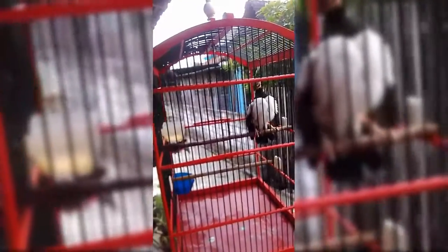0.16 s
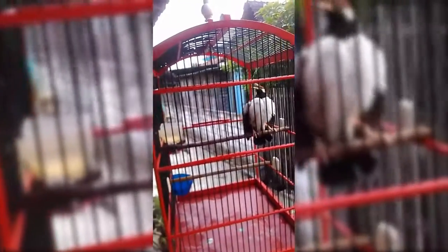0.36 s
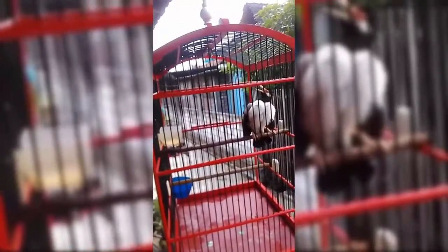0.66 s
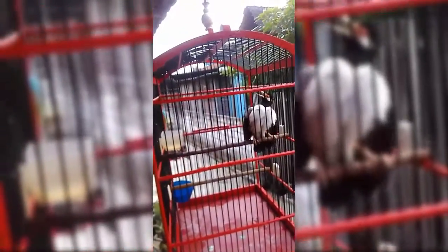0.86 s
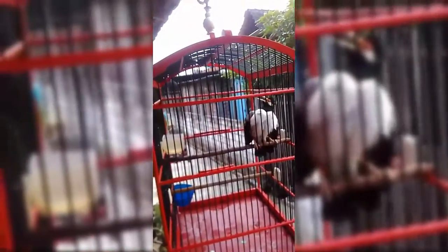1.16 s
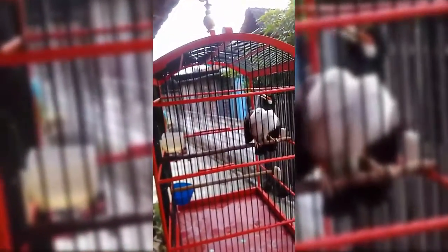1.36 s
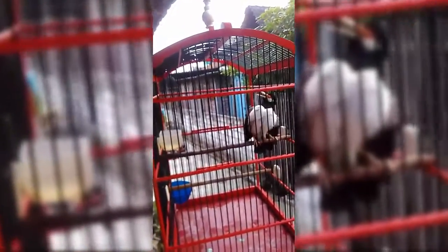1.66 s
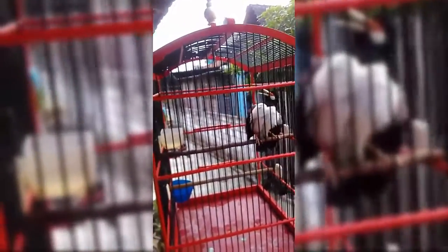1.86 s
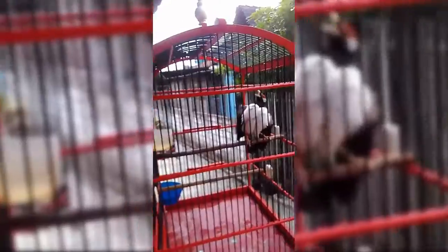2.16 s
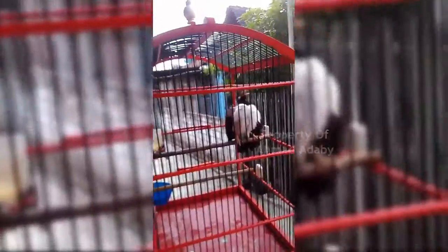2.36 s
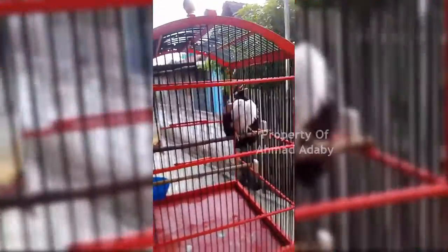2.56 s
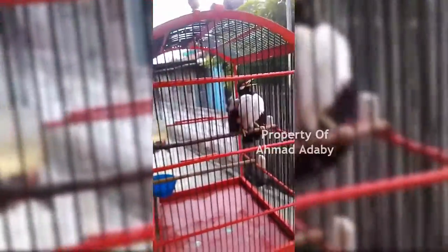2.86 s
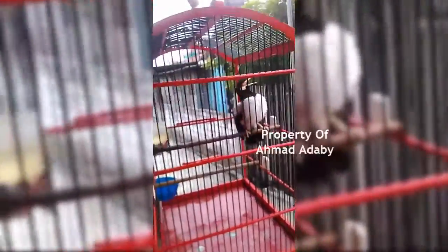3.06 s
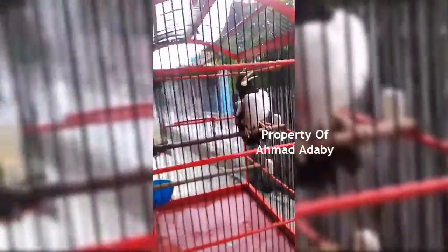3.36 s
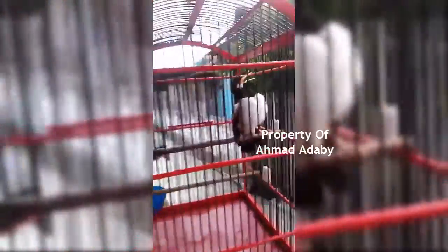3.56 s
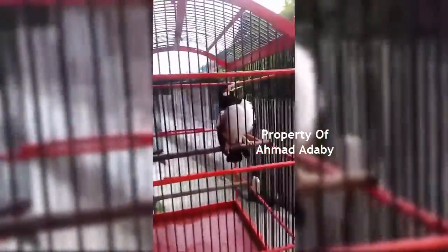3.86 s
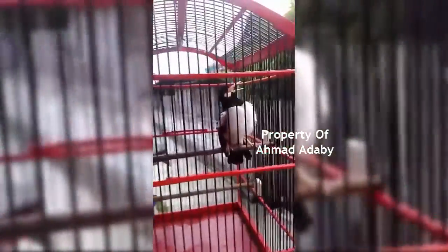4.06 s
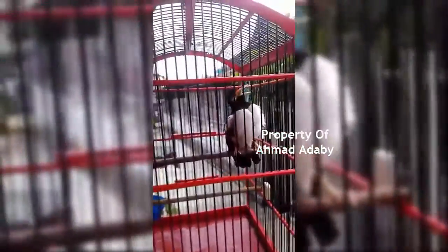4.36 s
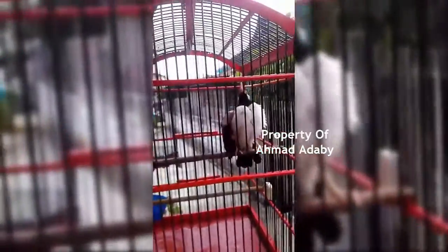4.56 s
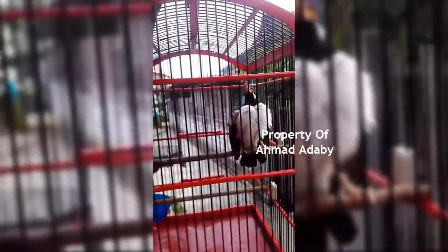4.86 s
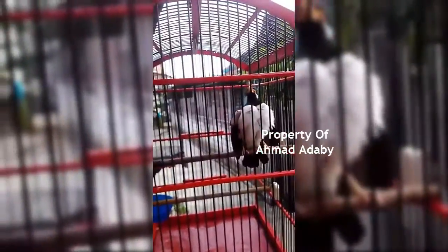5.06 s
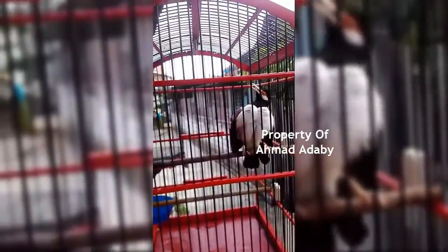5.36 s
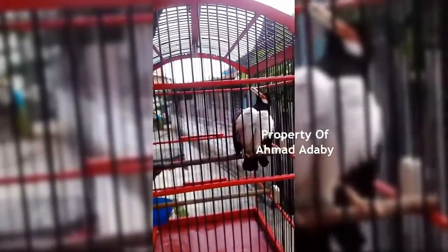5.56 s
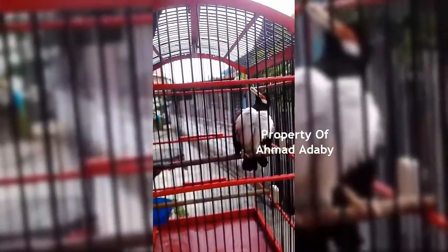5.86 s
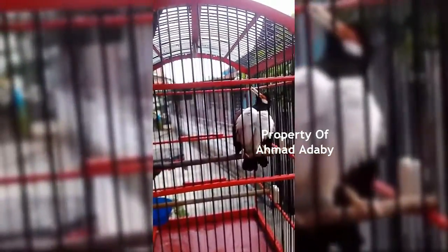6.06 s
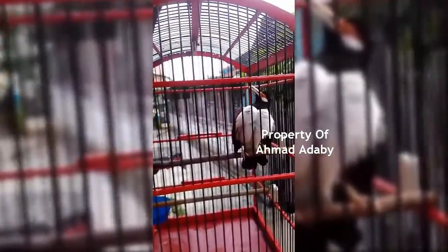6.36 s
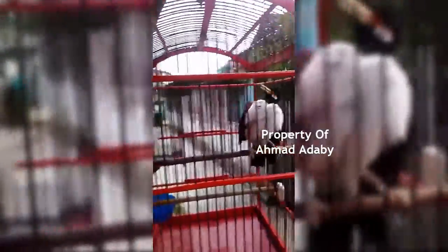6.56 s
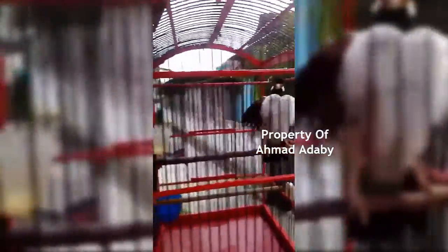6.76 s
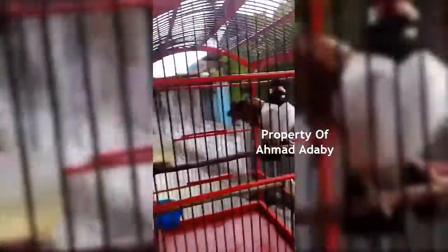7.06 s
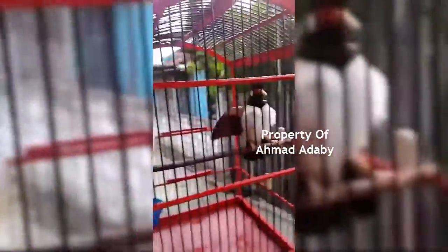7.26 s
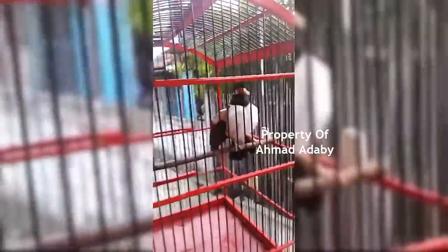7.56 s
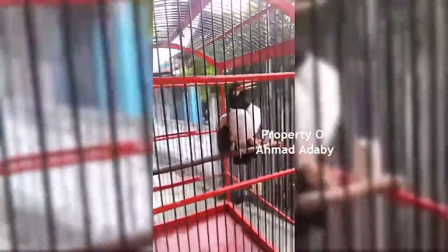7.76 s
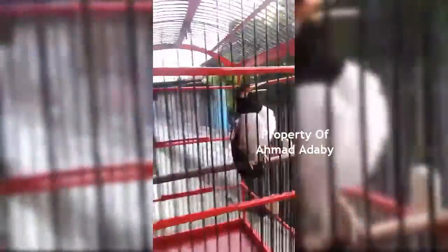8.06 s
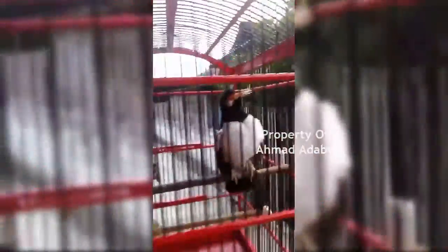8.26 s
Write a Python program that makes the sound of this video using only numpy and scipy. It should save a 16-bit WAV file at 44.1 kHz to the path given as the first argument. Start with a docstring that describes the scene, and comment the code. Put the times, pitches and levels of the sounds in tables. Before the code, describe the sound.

A caged starling sings rasps, screeches, whistles, chatter and trills up close, while wind buffets the microphone and another bird calls further off.

```python
"""A starling's rasp opens a run of screeches, whistles, chatter and trills, close to two microphone ports.
It sings from a cage in a walled yard, on the swinging membranes of its syrinx; another bird calls further
off. Wind buffets both ports and hums across the left one, over a faint hiss.
The recorder changes its sample rate crudely, which scatters mirror lines around every note."""
import sys
import numpy as np
from scipy import signal
from scipy.fft import rfft, irfft
from scipy.io import wavfile
from scipy.ndimage import uniform_filter1d

SR = 44100
rng = np.random.default_rng(int(sys.argv[2]) if len(sys.argv) > 2 else 0)


def to_wav(sig):
    """Store sig (one row per channel, or 1-D mono) as 16-bit WAV at the path in sys.argv[1].

    Samples outside -1..1 are clipped; the rate is SR.
    """
    pcm = np.clip(np.atleast_2d(sig), -1, 1) * 32767
    pcm = np.round(pcm).astype(np.int16)
    wavfile.write(sys.argv[1], SR, pcm.T)  # frames by channels


N = 370440   # 8.4 s


def from_db(db):
    return 10 ** (np.asarray(db) / 20)


def rms_one(x):
    return x / np.sqrt(np.mean(x ** 2) + 1e-20)


def drift(rate_hz):
    """Random wander: noise through a double one-pole low-pass; rms 1."""
    r = np.exp(-2 * np.pi * rate_hz / SR)
    return rms_one(signal.lfilter([1], [1, -2 * r, r * r], rng.standard_normal(N + SR))[SR:])


def coloured(spectrum):
    """Unrelated noise for each port, shaped by (f/Hz, level/dB) points; rms 1."""
    hz, db = np.transpose(spectrum)
    bin_hz = np.arange(N // 2 + 1) * SR / N
    gain = from_db(np.interp(np.log(bin_hz + 1), np.log(hz), db))
    return rms_one(irfft(rfft(rng.standard_normal((2, N))) * gain, N))


def resonance(x, hz, width_hz):
    r = np.exp(-np.pi * width_hz / SR)
    return signal.lfilter([1, 0, -1], [1, -2 * r * np.cos(2 * np.pi * hz / SR), r * r], x)


def contours(notes):
    """Columns of a list of notes over time, and a gate with 2 ms edges."""
    t, gate = np.arange(N) / SR, np.zeros(N)
    for note in notes:
        gate[int(note[0][0] * SR):int(note[-1][0] * SR) + 1] = 1
    times, *columns = np.transpose(np.concatenate(notes))
    return [np.interp(t, times, c) for c in columns], uniform_filter1d(gate, 90)


def hiss(level_db=-53):
    """A faint, steady noise floor, strongest near 300 Hz."""
    # f/Hz, level/dB
    spectrum = [(180, -30.5), (300, -2), (434, -21), (694, -23.5), (742, -24), (1430, -24.5),
                (5550, -25.5), (14200, -24), (16500, -64)]
    return from_db(level_db) * coloured(spectrum)


def wind():
    """Lumpy pressure on each port separately; air across the left opening hums and rushes."""
    # gusts at the microphone: t/s, buffeting level/dB, hum and rush level/dB
    gusts = [(0.0, -48, -26), (0.07, -17.5, -42), (0.28, -32, -36.5), (0.42, -18.5, -35.5),
             (0.49, -21.5, -44), (0.61, -35, -48), (0.68, -26, -56), (0.89, -34, -57), (1.1, -26, -77),
             (1.17, -24, -46), (1.24, -44, -39), (1.31, -22, -38.5), (1.45, -37, -38.5), (1.52, -20.5, -34),
             (1.61, -47, -38), (1.68, -39, -46.5), (1.78, -19, -64), (1.92, -33, -55), (2.03, -35.5, -60),
             (2.1, -21.5, -58), (2.36, -38.5, -56), (2.5, -21.5, -29), (2.62, -25, -46.5), (2.71, -33, -38),
             (2.88, -31, -39.5), (3.02, -35, -36), (3.16, -31.5, -33), (3.3, -37, -33), (3.41, -26, -39.5),
             (3.48, -37, -46), (3.81, -31.5, -62), (3.9, -24.5, -65), (3.95, -32, -53.5), (4.05, -41, -55),
             (4.19, -31, -43), (4.3, -16, -51), (4.42, -28.5, -50.5), (4.47, -16, -35), (4.7, -27.5, -36),
             (4.84, -21.5, -36), (4.96, -25, -38), (5.15, -20.5, -50.5), (5.29, -34, -50.5),
             (5.54, -29, -52), (5.61, -20.5, -43), (5.71, -31.5, -39), (5.85, -33.5, -54),
             (6.13, -34.5, -71.5), (6.25, -37.5, -70), (6.41, -35, -65.5), (6.62, -39, -52),
             (6.85, -38.5, -66), (7.02, -35, -73), (7.3, -38, -70), (7.51, -47, -71), (7.67, -33.5, -70),
             (7.76, -41, -72), (7.98, -29, -36), (8.09, -29, -46.5), (8.28, -25, -38), (8.33, -8, -31),
             (8.4, -16, -52)]
    # pressure on the ports: f/Hz, level/dB
    buffet_spectrum = [(12, -35), (20, 2), (123, -20), (217, -25.5), (269, -29.5), (431, -38.5),
                       (500, -31.5), (650, -66.5), (1100, -120)]
    # air rushing past: f/Hz, level/dB
    rush_spectrum = [(120, -50), (200, -20), (540, -16), (620, -8), (888, -22.5), (1110, -15),
                     (2060, -26), (2400, -21.5), (2750, -29.5), (12000, -46), (15600, -74.5),
                     (22000, -120)]
    (buffet_db, hum_db), _ = contours([gusts])
    lumps = from_db(4.6 * np.array([drift(12), drift(12)]))
    buffet = coloured(buffet_spectrum) * lumps * from_db(buffet_db) * from_db([[-2.75], [3.75]])
    hum = rms_one(resonance(rng.standard_normal(N), hz=625, width_hz=40)) * [[2.4], [-.5]]
    rush = coloured(rush_spectrum) * from_db(5) * [[1.7], [.8]]
    return buffet + (hum + rush) * from_db(hum_db + 2.3 * drift(25))


def yard(x, t60_s=0.24, left_db=3, right_db=-7):
    """The walls return a dense tail, different at each port, after 4 ms."""
    t = np.arange(int(.6 * SR)) / SR
    tail = rng.standard_normal((2, len(t))) * from_db(-60 * t / t60_s) * (t > .004)
    tail = signal.lfilter([.5], [1, -.4], tail)   # the walls dull it a little
    tail = tail / np.sqrt(np.sum(tail ** 2, axis=1, keepdims=True))
    return signal.fftconvolve(x[None], tail, axes=1)[:, :N] * from_db([[left_db], [right_db]])


def at_ports(x, left_lag_samples=9, left_db=9):
    """Direct sound: the left port is louder and hears the birds a little later."""
    late = np.interp(np.arange(N) - left_lag_samples, np.arange(N), x)
    return np.array([late * from_db(left_db), x])


def syrinx(notes, partials, flutter, shake_hz=420):
    """Membranes swing almost as sines; roughness shakes pitch and level, flutter chops them in sweeps."""
    (hz, level_db, rough, bright_db), gate = contours(notes)
    flutter_hz, sweep_hz, dip = flutter   # sweep and dip at full roughness
    span = slice(int(notes[0][0][0] * SR), int(notes[-1][-1][0] * SR) + 90)
    rough = np.clip(rough, 0, 1)
    beat = (np.cumsum(flutter_hz * (1 + 0.091 * drift(20))) / SR) % 1
    pitch = hz * (1 + 0.06 * rough * drift(shake_hz)) + rough * sweep_hz * (.5 - beat)
    phase = 2 * np.pi * np.cumsum(pitch[span]) / SR
    shake_db = 6 * rough * drift(shake_hz)
    chop = 1 - np.clip(dip * rough, 0, 1) * np.cos(np.pi * beat) ** 2
    voice = np.zeros(N)
    for n, (multiple, db) in enumerate(partials):
        sway_db = np.roll(shake_db, 500 * n)[span]   # each partial sways in its own time
        voice[span] += from_db(db + sway_db + (multiple != 1) * bright_db[span]) * np.sin(multiple * phase)
    return np.sqrt(2) * voice * gate * from_db(level_db) * chop


def far_bird():
    """A second bird further off: four falling calls on one deeply chopped partial."""
    # its calls: t/s, f/Hz, level/dB, roughness/0-1, brightness/dB
    calls = [
        [(0.0, 4030, 1, 0.36, 0), (0.014, 3964, -24.5, 0.8, 0), (0.132, 3350, -15, 0.47, 0),
         (0.26, 3870, -41, 0.4, 0)],
        [(3.93, 4170, -66, 0.53, 0), (3.954, 3680, -66, 0.34, 0.0061), (4.03, 3630, -38.5, 0.54, 0.0037)],
        [(6.38, 3770, -76, 0.5, 0.0052), (6.402, 3700, -60, 0.49, 0), (6.496, 3390, -48, 0.52, 0),
         (6.584, 3200, -50, 0.35, 0), (6.596, 3170, -65, 0.31, 0), (6.68, 3230, -55, 0.46, 0.018)],
        [(7.04, 4050, -80, 0.4, 0), (7.062, 3820, -70, 0.5, 0), (7.152, 3517, -44.5, 0.4, 0),
         (7.258, 3334, -52.5, 0.31, 0), (7.316, 3300, -56, 0.34, 0), (7.354, 3210, -58, 0.4, 0.019),
         (7.43, 3120, -68, 0.4, 0)],
    ]
    return 1.2 * syrinx(calls, [(0.97, 0)], flutter=(85, 640, 2.8))


def thin_tones():
    """Two thin, high sine notes, well to the left."""
    # the notes: t/s, f/Hz, level/dB
    notes = [
        [(4.04, 9185, -37), (4.05, 9185, -22.5), (4.072, 9185, -11), (4.082, 9185, -24), (4.14, 9188, -26)],
        [(4.2, 10760, -41.5), (4.306, 10500, -43.5), (4.332, 10760, -33), (4.362, 10500, -48),
         (4.396, 10760, -39), (4.422, 10450, -44), (4.532, 11040, -32), (4.55, 10760, -43.5)],
    ]
    (hz, level_db), gate = contours(notes)
    return np.sin(2 * np.pi * np.cumsum(hz) / SR) * from_db(level_db) * gate * [[3.2], [.32]]


def claw_tick():
    """A claw knocks on the perch: a short, dry burst of noise."""
    # the knock: t/s, level before the band-pass/dB
    knocks = [(7.135, -18.5)]
    bursts, decay = np.zeros(N), np.exp(-np.arange(200) / 15.4)
    for at_s, level_db in knocks:
        start = int(at_s * SR)
        bursts[start:start + 200] = from_db(level_db) * rng.standard_normal(200) * decay
    return signal.sosfilt(signal.butter(2, [1200, 5000], "band", fs=SR, output="sos"), bursts)


def croak(lower_hz=956, upper_hz=2000, decay_s=0.0045):
    """A low croak close by: separate pulses ring a sliding throat resonance and two steady ones."""
    # the throat: t/s, pulse rate/Hz, f/Hz, level/dB
    throat = [(7.15, 77, 977, -61), (7.206, 77, 1012, -42), (7.332, 77, 1170, -38), (7.434, 77, 998, -48.5),
              (7.5, 77, 922, -50), (7.58, 77, 940, -61.5)]
    (pulse_hz, throat_hz, level_db), gate = contours([throat])
    cycles = np.cumsum(pulse_hz * (1 + 0.033 * drift(30))) / SR
    since_pulse = (cycles % 1) / pulse_hz
    ring = np.sin(2 * np.pi * throat_hz * since_pulse)
    ring += 0.24 * np.sin(2 * np.pi * lower_hz * since_pulse)
    ring += from_db(-18.5) * np.sin(2 * np.pi * upper_hz * since_pulse)
    return 2.17 * ring * np.exp(-since_pulse / decay_s) * from_db(level_db + 2.4 * drift(210)) * gate


def starling():
    """The caged bird, close to the microphone: ten phrases from its syrinx."""
    # the song, a list per note: t/s, f/Hz, level/dB, roughness/0-1, brightness/dB
    rasp = [
        [(0.06, 4347, -31, 0.77, -2), (0.092, 4677, -23.5, 0.7, 9.5), (0.158, 4750, -23.5, 0.65, 4.5),
         (0.198, 4523, -22, 0.88, 5.5), (0.286, 4538, -16, 0.36, 5.5), (0.318, 4310, -14, 0.69, -7.5),
         (0.35, 4390, -30, 0.7, 8)],
    ]
    screeches = [
        [(0.436, 5468, -24, 0.62, 2), (0.492, 5756, -15, 0.58, 2.5), (0.516, 5467, -17, 0.5, 2),
         (0.536, 5580, -16.5, 0.77, -1), (0.608, 5475, -19, 0.49, -0.5), (0.664, 5564, -41, 0.75, 3)],
        [(0.718, 5240, -19.5, 0.69, -2), (0.73, 5456, -15.5, 0.48, -3.0), (0.788, 5460, -13.5, 0.58, -2),
         (0.84, 5415, -17.5, 0.58, -1), (0.89, 5370, -20.5, 0.6, -4), (0.924, 5434, -29.5, 0.6, 0.5)],
        [(1.031, 5233, -21.5, 0.6, -2), (1.079, 5350, -17.0, 0.68, 1.0), (1.187, 5307, -20.5, 0.61, -1),
         (1.225, 5426, -23, 0.69, 0.5), (1.257, 5502, -25, 0.78, -1.5), (1.275, 5340, -29.5, 0.79, 2)],
    ]
    dipping_whistle = [
        [(1.398, 3560, -21, 0.26, 6.5), (1.418, 3630, -15, 0.37, 5), (1.43, 2950, -11, 0.28, -2.5),
         (1.45, 2700, -14, 0.24, -4), (1.482, 2609, 2.5, 0.24, -1), (1.528, 2627, -24, 0.11, 7),
         (1.552, 2757, -5.5, 0.059, -4.5), (1.594, 2856, -10.0, 0.05, -8), (1.626, 2806, -44, 0.05, 4),
         (1.74, 2856, -47, 0.05, 9)],
    ]
    chatter = [
        [(1.758, 3370, -16, 0.05, -10.0), (1.774, 3196, -21.0, 0.19, -2.0), (1.79, 3350, -13, 0.5, 0),
         (1.84, 3060, -19.5, 0.5, 3), (1.874, 3126, -28, 0.5, 3)],
        [(1.911, 3430, -14, 0.05, -1.1), (1.939, 3107, -17, 0.5, -0.12), (1.949, 3260, -7.5, 0.5, -1.0),
         (1.971, 3206, -12.5, 0.5, 0.16), (2.015, 3067, -27, 0.5, 0.0)],
        [(2.052, 3384, -22.5, 0.05, 2.0), (2.068, 3132, -18.5, 0.19, 0.72), (2.086, 3346, -12.5, 0.5, 0.078),
         (2.12, 3105, -11.5, 0.5, -1.0), (2.154, 3146, -34, 0.5, 0.0)],
        [(2.198, 3510, -27, 0.05, 1.0), (2.206, 3260, -13, 0.05, -1.36), (2.222, 3060, -14, 0.47, 1.6),
         (2.264, 3067, -16, 0.5, 0.8), (2.3, 2997, -34, 0.5, 0.0)],
    ]
    scoops = [
        [(2.333, 4630, -23.5, 0.026, -12), (2.345, 4300, -18, 0.04, -13.5), (2.359, 4153, -11, 0.047, -10),
         (2.415, 4234, -11.5, 0.041, 6.5), (2.457, 4605, -9.5, 0.22, 13.5), (2.459, 4836, -9.5, 0.21, 8.5),
         (2.467, 4840, -16.5, 0.12, 0), (2.469, 5294, -5.5, 0.31, 1.5), (2.481, 6060, -4, 0.37, -7.5)],
        [(2.553, 5770, -22.5, 0.027, -9), (2.565, 4560, -14, 0.025, -2.5), (2.573, 4210, -16, 0.03, -7),
         (2.595, 3964, -20.5, 0.037, 8.5), (2.631, 4024, -7.5, 0.072, 5.0), (2.683, 4656, -9, 0.31, 4),
         (2.685, 5120, -3.5, 0.27, 3.5), (2.693, 5730, -17.5, 0.55, 1), (2.701, 5770, -6, 0.42, -2)],
        [(2.792, 5469, -19, 0.04, -8), (2.808, 4256, -13, 0.026, -4), (2.832, 3805, -20, 0.037, 0),
         (2.848, 3815, -11.5, 0.053, -3.5), (2.896, 4005, -12, 0.13, 5), (2.922, 4573, -1.5, 0.2, 6.5),
         (2.932, 4637, -22, 0.43, 4), (2.938, 5490, -10.5, 0.32, 2.5), (2.942, 5580, -7, 0.69, -3)],
        [(3.049, 5600, -19.5, 0.025, -14), (3.063, 4442, -14.5, 0.016, -5), (3.069, 4177, -20, 0.033, -2.5),
         (3.097, 3732, -13.5, 0.082, 2.5), (3.135, 3945, -14.5, 0.022, 2.5), (3.165, 4155, -6, 0.064, 6.5),
         (3.193, 4876, -5.5, 0.3, 12), (3.195, 5290, -20.5, 0.28, 1.5), (3.203, 5860, 7, 0.35, 0.5)],
    ]
    pips = [
        [(3.352, 1940, -19, 0.03, 1.5), (3.356, 2120, -23, 0.027, 5), (3.362, 2210, -13.5, 0.034, 1.5),
         (3.382, 2223, -16, 0.03, -5)],
        [(3.39, 2206, -21, 0.03, -7.0), (3.394, 2226, -28, 0.03, -11), (3.4, 2250, -21, 0.03, -6.5),
         (3.404, 2240, -17, 0.028, -10.0)],
        [(3.416, 2390, 0, 0.039, -4.5), (3.422, 2468, -18.5, 0.03, -4), (3.444, 2310, -12, 0.03, -10),
         (3.454, 2430, -26.5, 0.03, -7)],
        [(3.472, 2184, -12.5, 0.03, 1.5), (3.476, 2510, -17.5, 0.034, -14.5), (3.48, 2482, -8.0, 0.034, -4.5),
         (3.52, 2513, -19, 0.018, -19)],
        [(3.534, 2562, -1, 0.035, -3), (3.54, 2450, -17.5, 0.03, 10.5), (3.546, 2480, -8.5, 0.037, 2),
         (3.578, 2493, -15.5, 0.023, -9)],
        [(3.6, 2460, -13.5, 0.03, -1.5), (3.604, 2459, -12.0, 0.03, 4.0), (3.638, 2425, -19.5, 0.03, 0.5),
         (3.644, 2450, -17.5, 0.03, -5.5)],
        [(3.668, 2300, -14, 0.03, 2.7), (3.678, 2446, -11, 0.03, 0.88), (3.704, 2380, -18, 0.03, 6.1),
         (3.712, 2440, -16, 0.03, 2.0)],
        [(3.734, 2158, -7, 0.03, 4), (3.736, 2434, -9, 0.03, 1.0), (3.744, 2444, -6.5, 0.03, -2.0),
         (3.778, 2382, -21.5, 0.03, -8)],
    ]
    trill = [
        [(4.041, 4470, -17.5, 0.025, -9.5), (4.077, 4554, -14, 0.045, -1), (4.101, 4462, -16.5, 0.03, -11),
         (4.111, 4350, -12, 0.03, -10)],
        [(4.12, 4490, -22, 0.03, -2), (4.122, 3639, -17.0, 0.035, 0.0), (4.15, 3797, -14, 0.034, -7),
         (4.174, 3962, -11, 0.03, -6)],
        [(4.18, 3973, -18.5, 0.03, -8), (4.184, 3208, -15, 0.03, -2), (4.222, 3655, -12.5, 0.03, -7.5),
         (4.232, 3509, -26, 0.03, -8)],
        [(4.242, 3750, -38, 0.03, -5.5), (4.248, 3096, -24, 0.033, -2), (4.254, 3186, -19, 0.03, -5.5),
         (4.292, 3630, -22, 0.03, -5)],
        [(4.305, 3620, -31, 0.03, -2), (4.311, 3133, -21, 0.03, -1), (4.319, 3207, -26.5, 0.038, 0),
         (4.345, 3480, -20, 0.03, -2)],
        [(4.367, 2993, -35.0, 0.034, 11), (4.381, 3130, -28.5, 0.03, 11), (4.395, 3435, -21, 0.03, 3.8),
         (4.405, 3402, -28, 0.03, 2.0)],
        [(4.43, 3454, -34, 0.03, 8.0), (4.432, 3040, -29, 0.03, 11), (4.436, 2930, -37, 0.03, 14),
         (4.466, 3400, -21, 0.03, 6.3)],
        [(4.49, 2920, -40, 0.029, 21), (4.496, 3050, -37, 0.03, 23), (4.52, 3464, -24.5, 0.03, 18),
         (4.532, 3290, -34, 0.03, 15)],
        [(4.563, 3040, -44, 0.03, 19), (4.569, 3100, -28.0, 0.03, 21.3), (4.577, 3130, -39.5, 0.03, 21),
         (4.589, 3320, -43, 0.03, 12.0)],
    ]
    nasal_calls = [
        [(4.736, 2648, -22, 0.019, -17), (4.744, 2605, -12.5, 0.03, -18.5), (4.772, 2562, -20.5, 0.041, -5),
         (4.89, 2562, -36.5, 0.044, 9), (4.904, 2540, -34.5, 0.03, -5), (4.914, 2519, -48.5, 0.034, 4)],
        [(4.98, 2670, -38, 0.033, -20), (4.986, 2648, 0, 0.03, -17), (4.992, 2670, -16, 0.023, -9.5),
         (5.082, 2583, -15, 0.022, -11.5), (5.182, 2583, -23, 0.026, -8.5), (5.2, 2619, -51, 0.03, -5)],
        [(5.279, 2612, -21, 0.03, -23), (5.297, 2627, -10, 0.026, -14.5), (5.371, 2562, -20.5, 0.021, -7),
         (5.463, 2519, -34, 0.038, 1), (5.475, 2519, -54, 0.034, 10), (5.499, 2562, -52.0, 0.03, 8)],
    ]
    hoarse_call = [
        [(7.758, 2810, -35, 0.39, -5), (7.768, 2720, -17.5, 0.43, -4), (7.796, 2740, -10, 0.36, -4.5),
         (7.88, 2710, -15, 0.57, 7.5), (7.946, 2517, -3, 0.45, -5), (7.97, 2518, -5.5, 0.62, 2.5)],
    ]
    falling_whistle = [
        [(8.078, 4750, -36, 0.019, -10), (8.082, 5580, -39, 0.027, 2.0), (8.084, 5490, -25, 0.03, -4),
         (8.126, 4995, -16, 0.029, -4), (8.204, 4340, -15, 0.18, 1), (8.222, 3856, -7.5, 0.27, -3),
         (8.266, 3436, -6, 0.42, -7), (8.292, 3016, 3, 0.27, 1), (8.33, 2618, -10.5, 0.91, 2),
         (8.34, 2300, -6, 0.71, 3), (8.398, 1936, -11, 0.37, 9)],
    ]
    # partials: multiple of f, level/dB; flutter: rate/Hz, downward sweep/Hz, level dip/0-1
    song = syrinx(rasp, [(.5, -6.5), (.72, -18), (1, 0.5), (1.2, -17), (1.5, -23), (2, -26.5)],
                  (150, 800, 0.2))
    song += syrinx(screeches, [(.39, -9), (.56, -14.5), (.63, -11), (.7, -8.5), (.84, -12.5),
                               (.98, 1.5), (1.7, -16.5), (2, -16)], (250, 100, .3))
    song += syrinx(dipping_whistle, [(1, 1), (2, -29)], (20, 110, 0.43))
    song += syrinx(chatter, [(.5, -20), (.75, -12), (1, -2), (1.5, -19), (2, -22), (3.3, -19.5)],
                   (47, 900, 0.42))
    song += syrinx(scoops, [(1, 4), (2, -16), (3, -27.5)], (80, 20, .1))
    song += syrinx(pips, [(1, 2), (2, -18.5), (4, -37)], (80, 29, 0.16))
    song += syrinx(trill, [(1, 5), (2, -14.5), (3, -25.5)], (80, 20, .1))
    song += syrinx(nasal_calls, [(.5, -9), (1, -3), (1.5, 1), (2, -15), (2.5, -24.5), (3, -27),
                                 (3.5, -35), (4, -33), (4.5, -29.5), (5, -34), (5.5, -35), (6, -29)],
                   (62, 15.1, 0.074))
    song += syrinx(hoarse_call, [(.5, -42), (1, -2), (2, -26), (2.5, -31.5), (3, -49)], (180, 590, 0.96))
    song += syrinx(falling_whistle, [(1, 5.5), (2, -19.5)], (140, 830, 0.36))
    return song


def scene():
    """Both birds reach the ports directly and off the walls, among wind and hiss."""
    birds = starling() + croak() + claw_tick() + far_bird()
    return at_ports(birds) + yard(birds) + thin_tones() + wind() + hiss()


def limiter(x, limit_db=1, recover_db_per_s=160, attack_s=.001):
    """Each channel is turned down at once over the limit and recovers at a steady rate."""
    ramp = recover_db_per_s * np.arange(N) / SR
    over_db = np.maximum(20 * np.log10(np.abs(x) + 1e-9) - limit_db, 0)
    held_db = np.maximum.accumulate(over_db + ramp, axis=1) - ramp
    return x * from_db(-uniform_filter1d(held_db, int(attack_s * SR) + 2, axis=1))


def record(dry):
    """Limited, clipped at 48 kHz, then brought down by the nearest sample: mirror lines 3.9 kHz apart."""
    capture_hz, cutoff_hz = 48000, 16200
    captured = np.clip(signal.resample_poly(limiter(dry), capture_hz, SR, axis=1), -.97, .97)
    nearest = np.round(np.arange(N) * capture_hz / SR).astype(int)
    mirrored = captured[:, np.minimum(nearest, captured.shape[1] - 1)]
    low_pass = signal.cheby2(14, 60, cutoff_hz, fs=SR, output="sos")
    return np.clip(signal.sosfilt(low_pass, mirrored), -1, 1)


dry = scene()
out = record(dry)
to_wav(out)
```